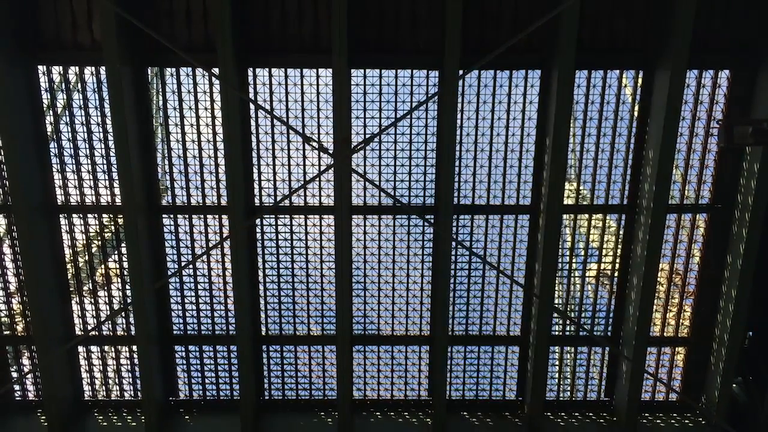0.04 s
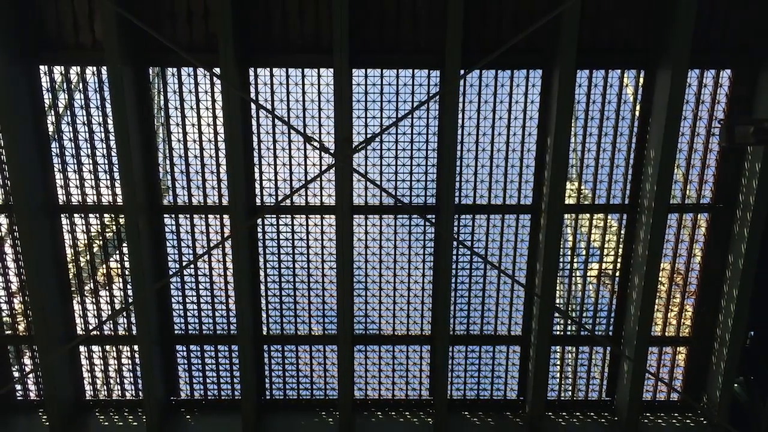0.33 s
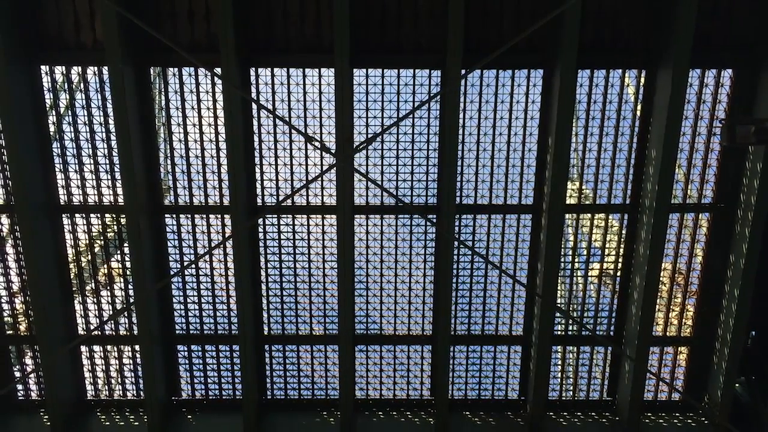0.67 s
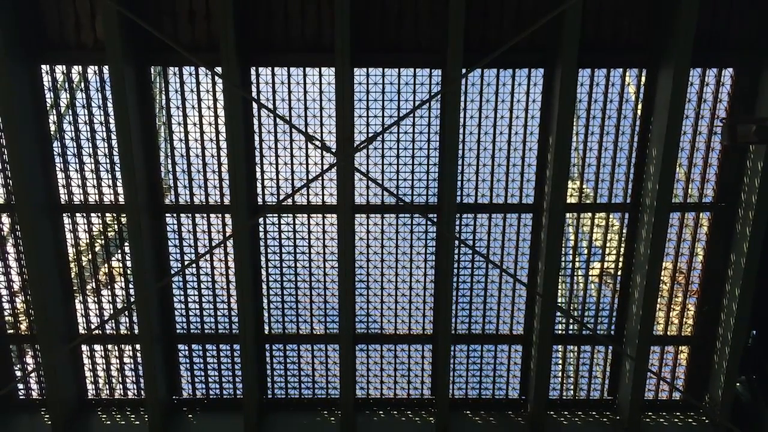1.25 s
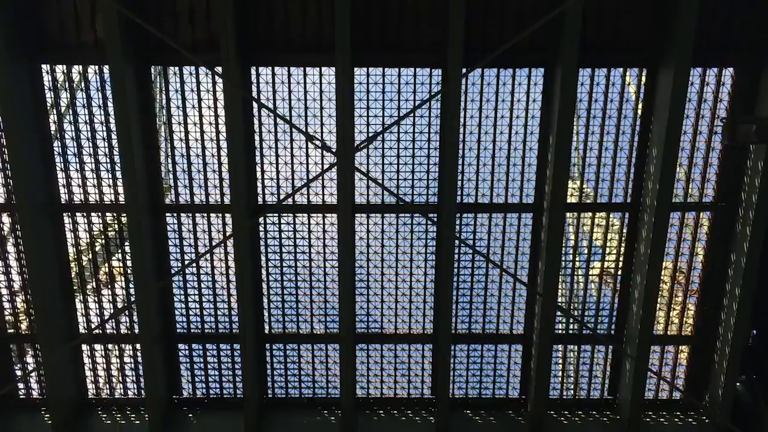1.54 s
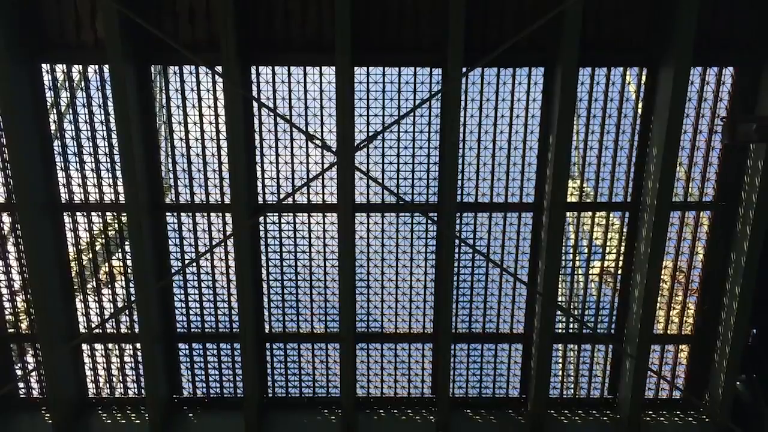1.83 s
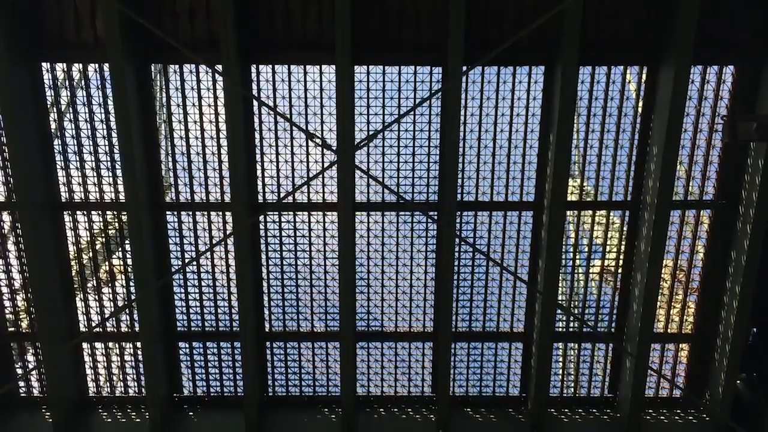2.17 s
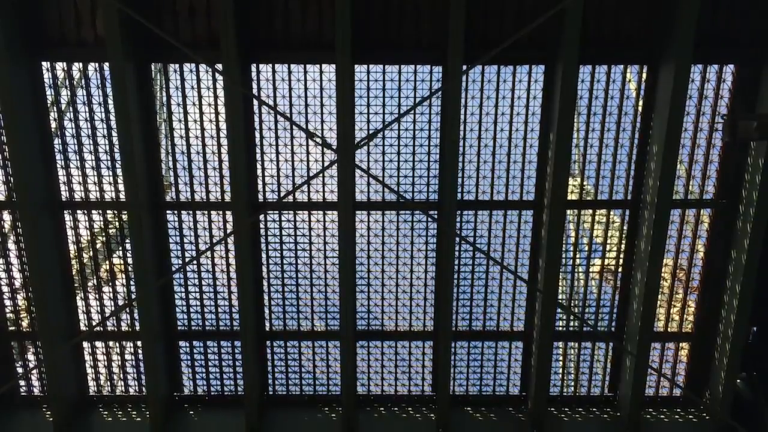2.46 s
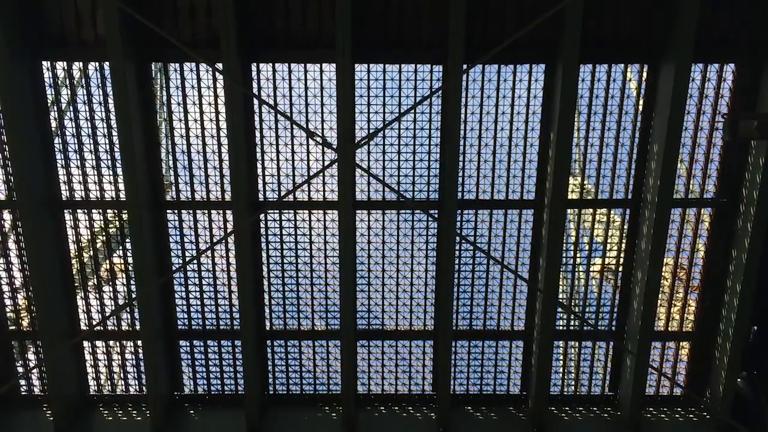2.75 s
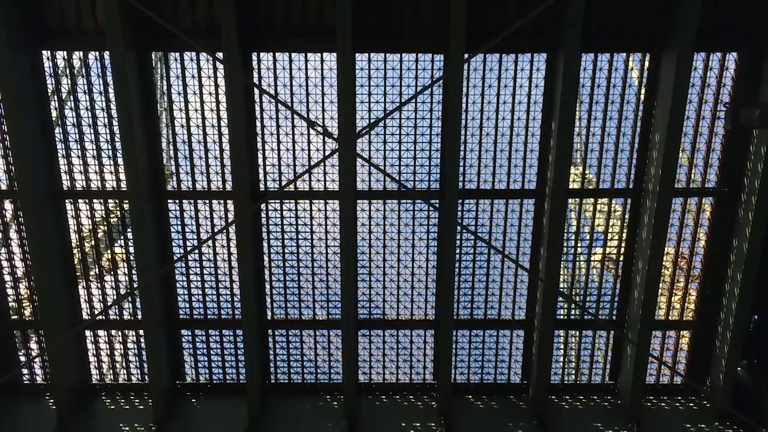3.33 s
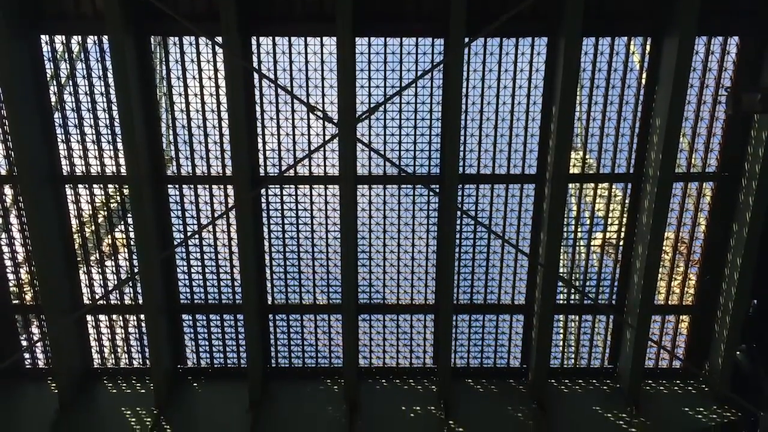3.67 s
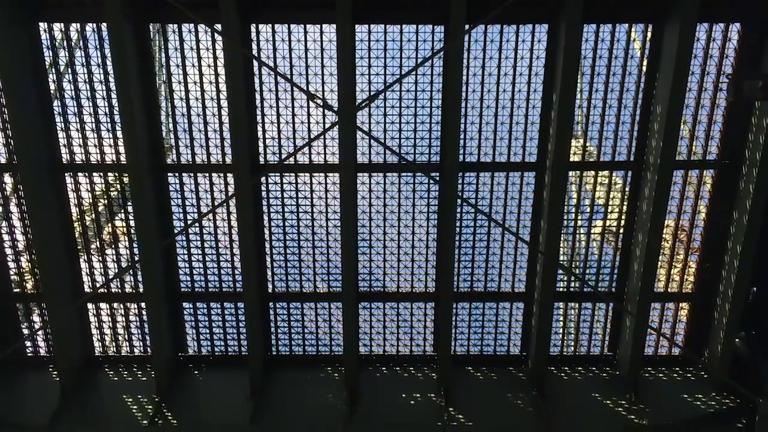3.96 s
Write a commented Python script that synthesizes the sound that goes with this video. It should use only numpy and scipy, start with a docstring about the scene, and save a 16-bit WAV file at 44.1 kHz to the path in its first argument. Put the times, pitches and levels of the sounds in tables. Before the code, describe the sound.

Heard from beneath an open steel bridge, traffic makes a steady low rumble. Tyres hum and hiss overhead as a heavy vehicle drones away, followed by soft, deep wheel thumps on the deck and a very faint high squeal.

```python
"""Under an open steel-grate bridge deck, with traffic overhead.
A heavy vehicle draws away: its drone sinks in pitch and fades in and out among the girders.
Passing tyres sing on the grating and hiss through it; later, wheels thump the panels.
Behind them the span shudders and rumbles, distant tyres roar and something squeals faintly."""
import sys
import numpy as np
from scipy import signal
from scipy.fft import rfft, irfft, next_fast_len
from scipy.io import wavfile
from scipy.ndimage import uniform_filter1d, map_coordinates

SR = 44100
rng = np.random.default_rng(int(sys.argv[2]) if len(sys.argv) > 2 else 0)


def output_pcm(signal):
    """Save a mono or channel-first signal as 16-bit PCM at the path in sys.argv[1].

    Samples are clipped to [-1, 1] before scaling.
    """
    pcm = np.clip(np.atleast_2d(signal).T, -1, 1) * 32767
    wavfile.write(sys.argv[1], SR, np.round(pcm).astype(np.int16))


N = 176400
T = np.arange(N) / SR


def amp(db):
    """Decibels to gain."""
    return 10 ** (np.asarray(db) / 20)


def unit(x):
    """Scale to rms 1."""
    return x / np.sqrt(np.mean(np.abs(x) ** 2) + 1e-20)


def curve(rows):
    """One value per sample from (seconds, value) rows."""
    return np.interp(T, *np.transpose(rows))


def wobble(rate_hz):
    """Smooth random curve, rate_hz knots a second."""
    return map_coordinates(rng.standard_normal(1024), [T * rate_hz], mode="wrap")


def swell(peak_s, sigma_s):
    """Gaussian rise and fall."""
    return np.exp(-.5 * ((T - peak_s) / sigma_s) ** 2)


def phase_of(hz):
    """Running phase in radians of a fixed or moving pitch."""
    return 2 * np.pi * np.cumsum(hz + np.zeros(N)) / SR


def filtered(x, response):
    """Apply a gain given as a function of Hz."""
    size = next_fast_len(N + SR // 2)
    return irfft(rfft(x, size) * response(np.fft.rfftfreq(size, 1 / SR)), size)[:N]


def patchy_noise(spectrum, patchy_db, smooth_above_hz=4000):
    """Coloured noise, rms 1, with patches of random gain that weaken in the treble."""
    bin_hz, _, frames = signal.stft(rng.standard_normal(N), SR, nperseg=1024)
    patches = uniform_filter1d(rng.standard_normal(frames.shape), size=5, axis=0, mode="wrap")
    patches = uniform_filter1d(patches, size=10, axis=1, mode="wrap")
    depth_db = patchy_db / (1 + (bin_hz[:, None] / smooth_above_hz) ** 2)
    noise = signal.istft(frames * amp(depth_db * unit(patches)), nperseg=1024)[1][:N]
    knot_hz, knot_db = np.transpose(spectrum)
    return unit(filtered(noise, lambda hz: amp(np.interp(np.log(hz + 1), np.log(knot_hz), knot_db))))


def blurred_tone(hz, width_hz, order=4):
    """Narrow noise band around hz, rms 1; a low order leaves wide skirts."""
    coarse_s = T[::16]
    offset_hz = np.fft.rfftfreq(len(coarse_s), coarse_s[1])
    lowpass = 1 / (1 + (offset_hz / (width_hz / 2 + 1)) ** order)
    slow_noise = irfft(rfft(rng.standard_normal((2, len(coarse_s)))) * lowpass, len(coarse_s))
    in_phase, quadrature = (np.interp(T, coarse_s, row) for row in slow_noise)
    phase = phase_of(hz)
    return unit(in_phase * np.cos(phase) + quadrature * np.sin(phase))


# Drone fundamental. Each row: time in seconds, pitch in Hz.
DRONE_PITCH_HZ = [(0, 106), (.25, 105.5), (.42, 108), (.62, 107.5), (.8, 104.5), (1.3, 103), (2, 101),
                  (2.5, 99), (4, 92)]
# Drone fundamental. Each row: time in seconds, level in dB.
DRONE_LEVEL_DB = [(0, -19), (.08, -23.5), (.155, -37), (.215, -21.5), (.28, -26), (.34, -25.5), (.445, -42),
                  (.5, -25), (.565, -27), (.595, -22.5), (.66, -23.5), (.685, -28), (.72, -23),
                  (.785, -20.5), (.835, -39), (.87, -29), (.935, -37), (.99, -26), (1.07, -34),
                  (1.14, -23.5), (1.19, -27), (1.235, -48), (1.28, -28), (1.31, -34), (1.37, -25.5),
                  (1.53, -41), (1.65, -23.5), (1.715, -28.5), (1.755, -47), (1.81, -30), (1.89, -27),
                  (2.02, -27), (2.1, -37), (2.28, -43), (2.38, -29), (2.46, -41), (4, -52)]
# Drone overtones. Each row: peak time in seconds, sigma in seconds, harmonic number, level in dB.
OVERTONE_SWELLS = [(0.11, 0.086, 2, -36), (0.396, 0.063, 2, -35), (0.645, .06, 2, -45.5),
                   (1.37, 0.02, 2, -44), (1.843, 0.045, 2, -37.5), (2.292, 0.082, 2, -38),
                   (0.369, .05, 3, -47), (0.55, 0.039, 3, -49), (1.09, .12, 3, -55.5)]

def vehicle_drone(jitter_hz=1.3, flutter_db=.4):
    """Three harmonics of the departing vehicle, each fading in and out on its own."""
    hz = curve(DRONE_PITCH_HZ) + jitter_hz * wobble(12)
    phase = phase_of(hz) + rng.uniform(0, 2 * np.pi)
    fundamental = amp(curve(DRONE_LEVEL_DB) + flutter_db * wobble(20)) * np.sin(phase)
    overtones = sum(amp(db) * swell(peak_s, sigma_s) * np.sin(harmonic * phase)
                    for peak_s, sigma_s, harmonic, db in OVERTONE_SWELLS)
    return np.sqrt(2) * (fundamental + overtones)


# Wheel blows on the panels. Each row: start in seconds, pitch in Hz, gain in dB.
THUMPS = [(2.298, 103, -24), (2.35, 107, -21), (2.472, 98, -20), (2.643, 116, -22), (2.693, 101, -14),
          (2.746, 88, -20), (2.8, 98, -13.5), (2.835, 88, -20), (2.955, 104, -18), (3.062, 88, -16),
          (3.14, 109, -17.5), (3.222, 92, -20), (3.27, 88, -15.5), (3.292, 98, -16), (3.39, 102, -21),
          (3.535, 101, -22), (3.668, 96, -21), (3.71, 99, -18), (3.85, 100, -16), (3.892, 121, -22),
          (3.963, 98, -17.5)]

def panel_thumps(rise_s=.0064, t60_s=.1, rough_db=1.5):
    """Each soft wheel blow sets a deck panel ringing for a few cycles."""
    out = np.zeros(N)
    for start_s, hz, db in THUMPS:
        age_s = np.maximum(T - start_s, 0)
        ring = np.sin(2 * np.pi * hz * age_s + rng.uniform(0, 2 * np.pi))
        attack = 1 - np.exp(-(age_s / rise_s) ** 2)
        decay = amp(db - 60 * age_s / t60_s + rough_db * wobble(80))
        out += attack * decay * ring
    return out


# Wheel passes. Each row: time overhead in seconds, half-width in seconds, level in dB.
WHEEL_PASSES = [(0.33, 0.21, -43.5), (0.598, 0.22, -43.5), (1.165, 0.14, -48)]
# Tyre tones on the bars. Each row: pitch overhead in Hz, level in dB relative to the pass.
BAR_TONES = [(548, -1.5), (640, -1.5), (735, -7)]

def tyre_song(doppler_depth=.11, glide_s=.3, wander=.015, rough_db=3):
    """Tyres sing roughly on the grating bars, falling in pitch as they pass."""
    out = np.zeros(N)
    for overhead_s, half_width_s, pass_db in WHEEL_PASSES:
        since_s = T - overhead_s
        doppler = 1 - doppler_depth * since_s / np.hypot(since_s, glide_s)
        nearness = 1 / (1 + (since_s / half_width_s) ** 2)
        for hz, db in BAR_TONES:
            tone = blurred_tone(hz * doppler * (1 + wander * wobble(14)), width_hz=55)
            rough_tone = unit(tone * amp(rough_db * wobble(90)))
            out += amp(pass_db + db) * nearness * rough_tone
    return out


# Flares of tyre song. Each row: peak time in seconds, sigma in seconds, pitch in Hz, level in dB.
SONG_FLARES = [(0.155, 0.023, 640, -43), (0.284, 0.013, 555.7, -37.5), (0.381, 0.021, 529, -40.5),
               (0.616, 0.027, 542, -41), (0.74, 0.086, 456, -47.5), (1.01, .025, 497, -47),
               (1.2, 0.21, 462, -49), (1.528, 0.028, 620, -45.5), (1.743, 0.059, 560, -54),
               (2.25, 0.068, 611, -49), (2.655, 0.69, 424, -49), (2.793, 0.028, 605, -46.5),
               (3.12, 0.09, 627, -51.5), (3.709, 0.27, 431.7, -53.5)]

def song_flares():
    """Blurred tyre song flares as wheels, near and far, catch a stretch of grating."""
    return sum(amp(db) * swell(peak_s, sigma_s) * blurred_tone(hz, width_hz=39)
               for peak_s, sigma_s, hz, db in SONG_FLARES)


# Spectra of the hiss and its fine top sizzle. Each row: frequency in Hz, relative density in dB.
HISS_SPECTRUM = [(300, -25), (700, 12.5), (1100, 6.5), (2000, 3), (2900, -11), (4700, -11.5), (6500, -20),
                 (8500, -27), (12000, -28.5), (15000, -46)]
SIZZLE_SPECTRUM = [(4000, -25), (7500, 1.5), (9500, 3.5), (11800, -2), (13700, -5.5), (15300, -17)]
# Their envelopes. Each row: time in seconds, level in dB.
HISS_LEVEL_DB = [(0, -53.5), (.22, -50.5), (.37, -47), (.48, -49), (.64, -48), (.8, -56.5), (.98, -53),
                 (1.11, -47.5), (1.26, -49), (1.45, -53.5), (1.9, -56), (2.4, -53), (2.62, -58),
                 (2.8, -53.5), (3.15, -55.5), (3.4, -61), (4, -63)]
SIZZLE_LEVEL_DB = [(0, -75), (.19, -73), (.3, -73), (.395, -68), (.46, -72), (.6, -74), (.8, -79),
                   (1.15, -79), (1.6, -85), (2.3, -88), (2.9, -95), (3.55, -88), (3.75, -96)]

def tyre_hiss(flicker_db=.8):
    """Hiss falls unevenly through the grating as wheels cross the openings."""
    flicker = amp(flicker_db * wobble(16))
    hiss = amp(curve(HISS_LEVEL_DB)) * patchy_noise(HISS_SPECTRUM, patchy_db=1.1)
    sizzle = amp(curve(SIZZLE_LEVEL_DB)) * patchy_noise(SIZZLE_SPECTRUM, patchy_db=.5)
    return flicker * (hiss + sizzle)


# Spectra of span shudder and deck rumble. Each row: frequency in Hz, relative density in dB.
SHUDDER_SPECTRUM = [(10, -30), (22, -11.5), (33, 4), (41, 0), (52, 5.5), (70, -15.5), (120, -54)]
RUMBLE_SPECTRUM = [(25, -32), (50, -7.5), (66, -10), (86, 1), (103, -1), (124, -1.5), (155, -3.5),
                   (176, -9), (208, -4.5), (240, -18), (330, -36), (600, -80.5)]
# Shudder envelope. Each row: time in seconds, level in dB.
SHUDDER_LEVEL_DB = [(0, -33), (.45, -44.5), (.7, -44.5), (1.2, -43), (1.8, -46), (2.8, -51.5), (3.3, -48),
                    (3.55, -48), (4, -47.5)]

def deck_rumble(rumble_db=-34.5, rise_db_per_s=.05):
    """The whole span shudders slowly beneath the near-steady rumble of the deck."""
    shudder = amp(curve(SHUDDER_LEVEL_DB)) * patchy_noise(SHUDDER_SPECTRUM, patchy_db=1.5)
    rumble = amp(rumble_db + rise_db_per_s * T) * patchy_noise(RUMBLE_SPECTRUM, patchy_db=-.24)
    return shudder + rumble


# Distant tyre roar. Each row: frequency in Hz, relative density in dB.
ROAR_SPECTRUM = [(120, -38.5), (255, -2.5), (305, 2), (350, -2.5), (400, 0), (520, 1), (650, 0),
                 (800, -9.5), (1000, -8.5), (1300, -15.5), (2000, -16.5), (2450, -21), (2850, -25.5),
                 (4300, -29), (5500, -32), (6700, -34), (8200, -44), (10000, -53), (12300, -57),
                 (15000, -59.5)]

def distant_roar(start_db=-42, fade_db_per_s=.49, flutter_db=.12):
    """Tyres roar farther along the bridge, easing slowly."""
    level_db = start_db - fade_db_per_s * T + flutter_db * wobble(11)
    return amp(level_db) * patchy_noise(ROAR_SPECTRUM, patchy_db=1.53)


# Squeals. Each row: peak time in seconds, sigma in seconds, pitch in Hz, width in Hz, level in dB.
SQUEALS = [(.385, .02, 11690, 120, -75), (2.38, .19, 6960, 400, -71.5), (2.92, 0.26, 5970, 480, -76)]

def squeals():
    """Thin, airy squeals, perhaps brakes, swell and fade."""
    return sum(amp(db) * swell(peak_s, sigma_s) * blurred_tone(hz, width_hz, order=2)
               for peak_s, sigma_s, hz, width_hz, db in SQUEALS)


def scene():
    """Mono sum at one point under the deck."""
    sustained = vehicle_drone() + deck_rumble() + distant_roar()
    wheels = panel_thumps() + tyre_hiss() + tyre_song() + song_flares()
    return (sustained + wheels + squeals())[None]


def record(dry):
    """Brick-wall low-pass at 15.3 kHz."""
    return filtered(dry[0], lambda hz: hz < 15300)[None]


dry = scene()
out = record(dry)
output_pcm(out)
```